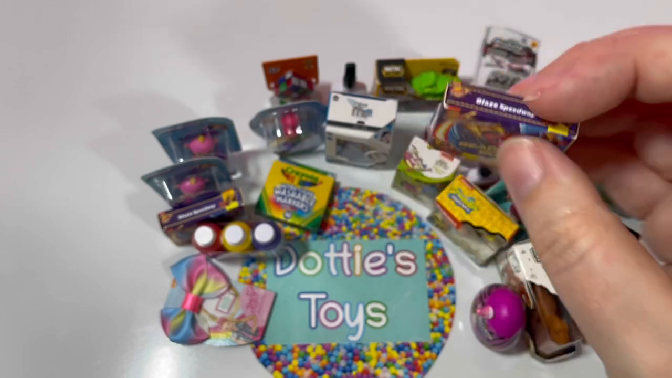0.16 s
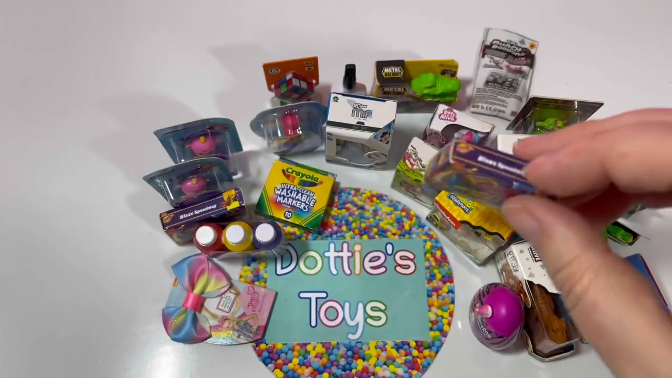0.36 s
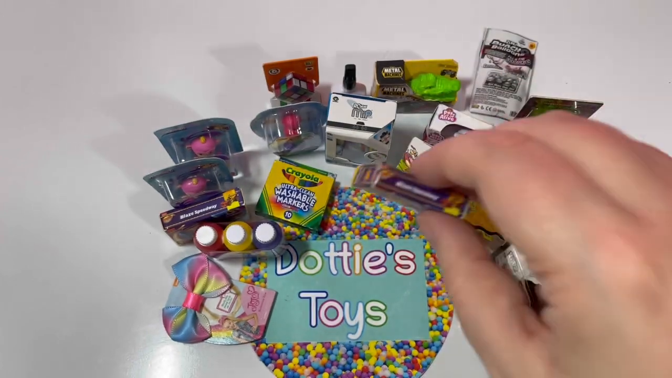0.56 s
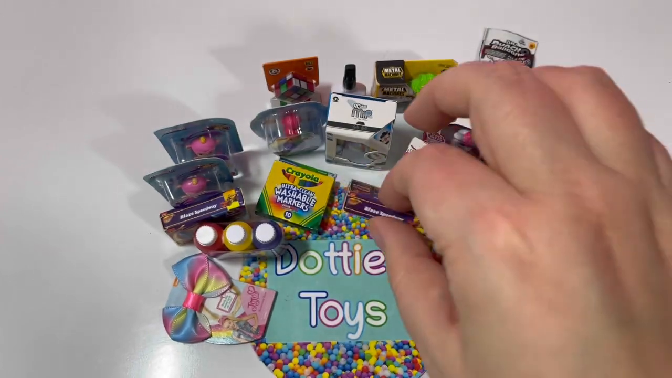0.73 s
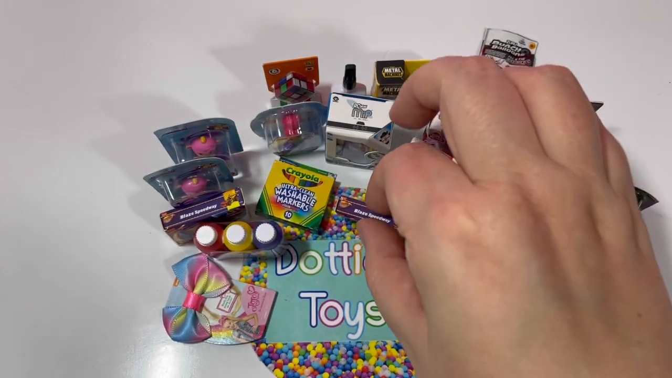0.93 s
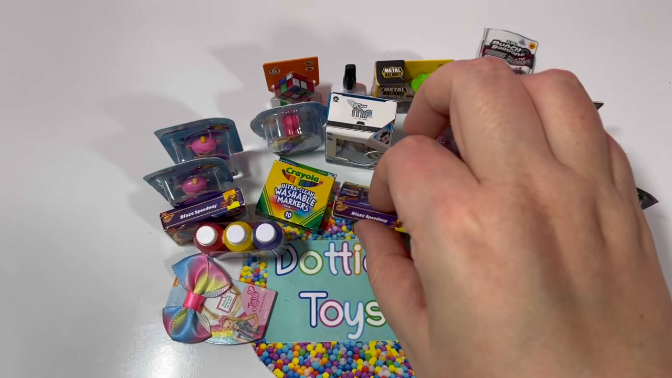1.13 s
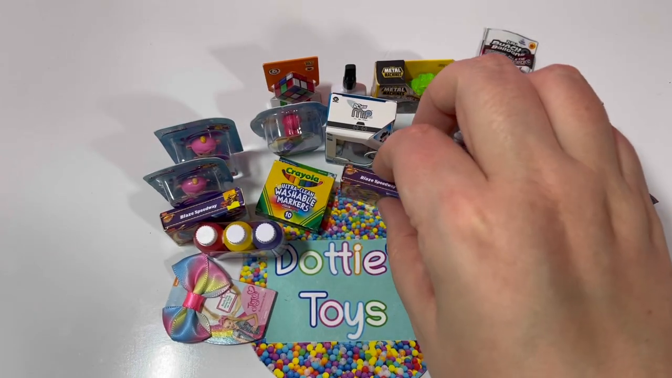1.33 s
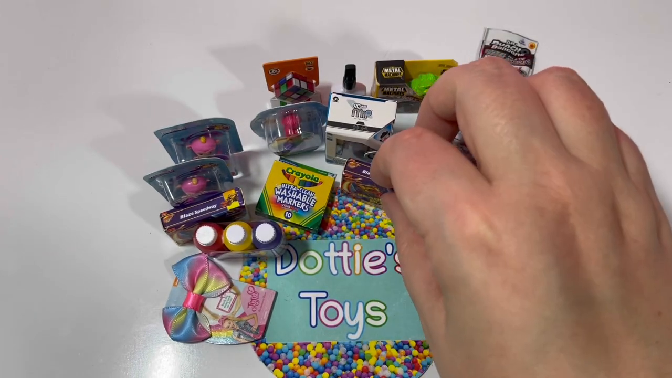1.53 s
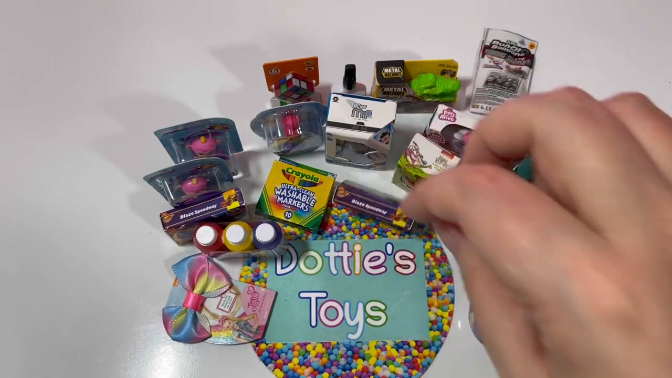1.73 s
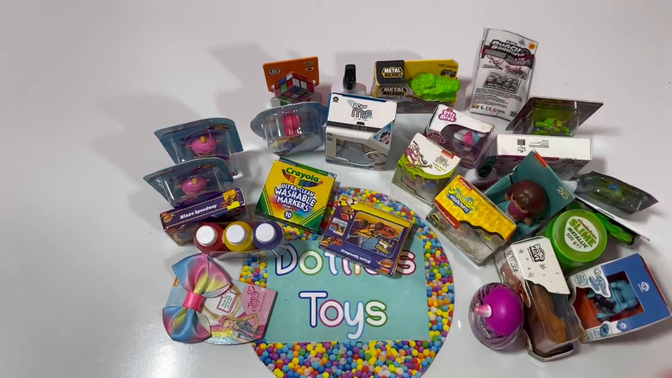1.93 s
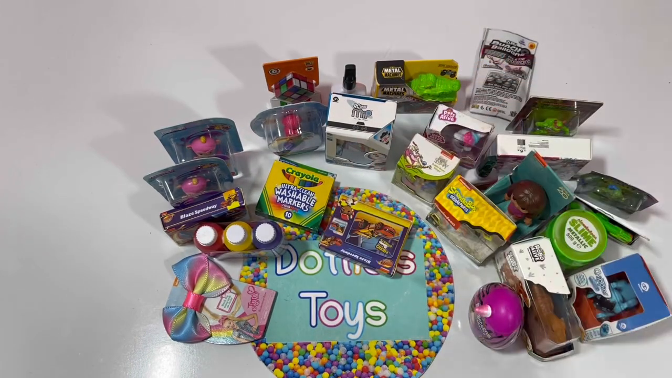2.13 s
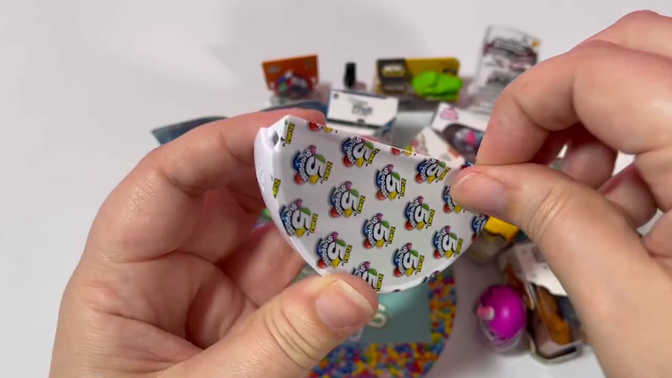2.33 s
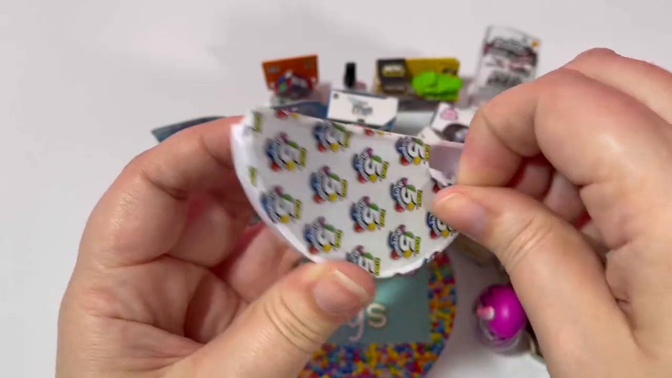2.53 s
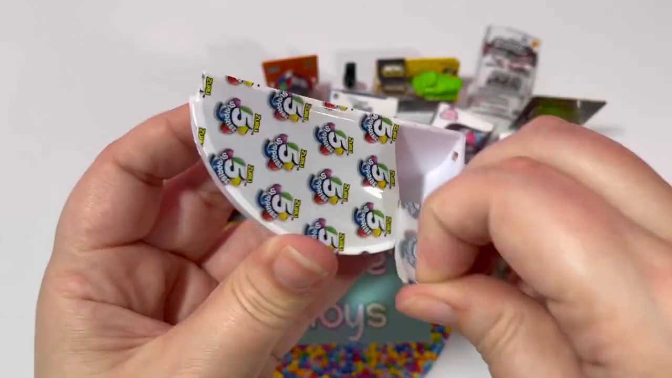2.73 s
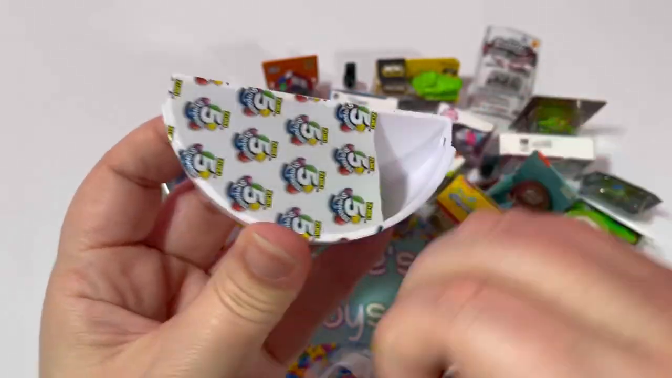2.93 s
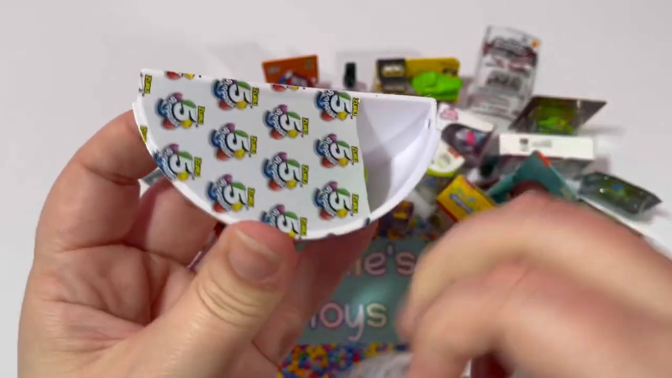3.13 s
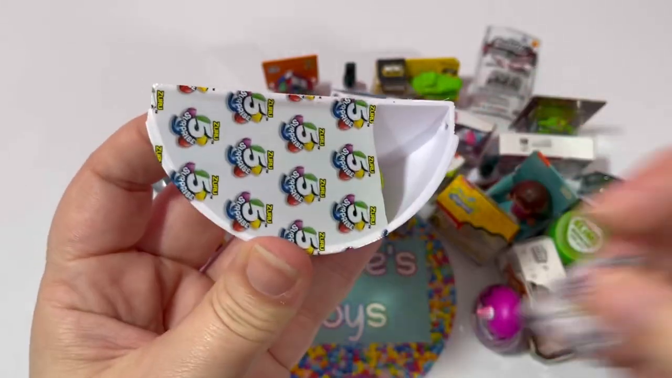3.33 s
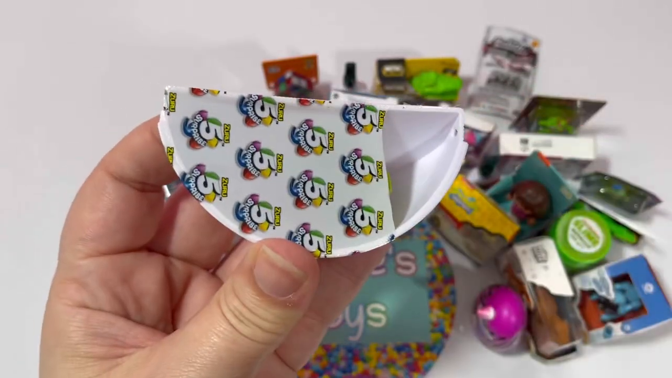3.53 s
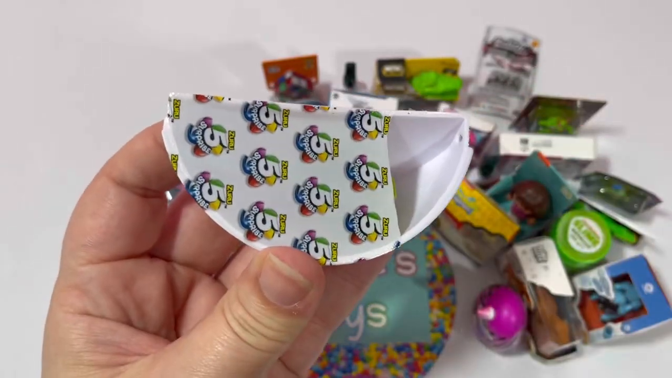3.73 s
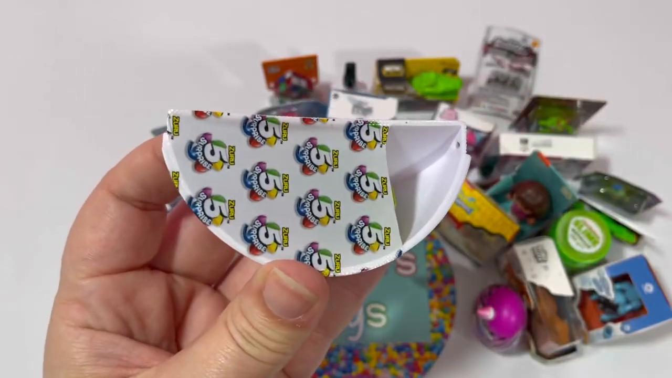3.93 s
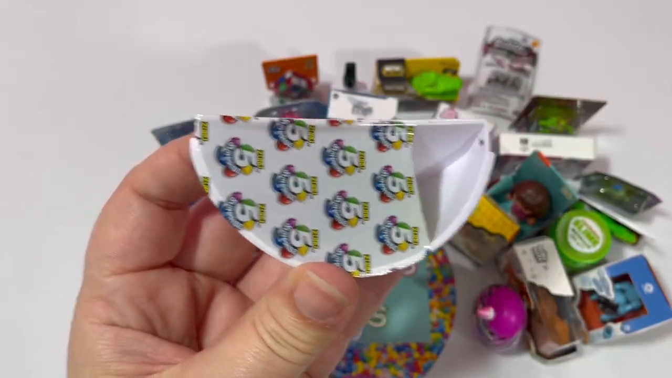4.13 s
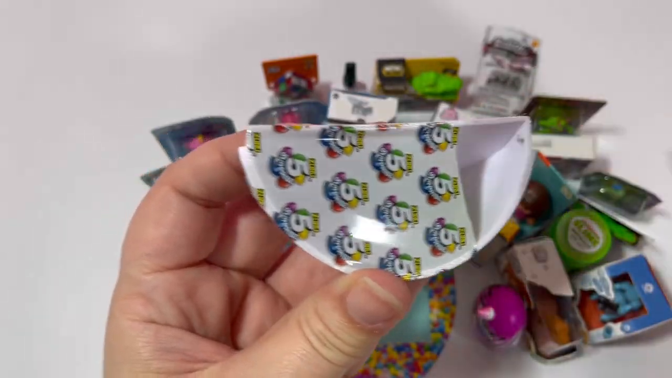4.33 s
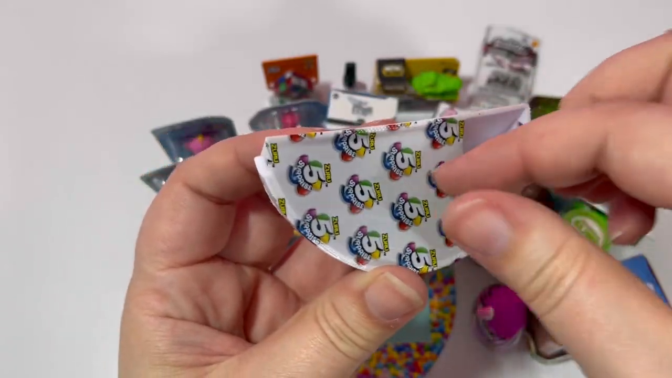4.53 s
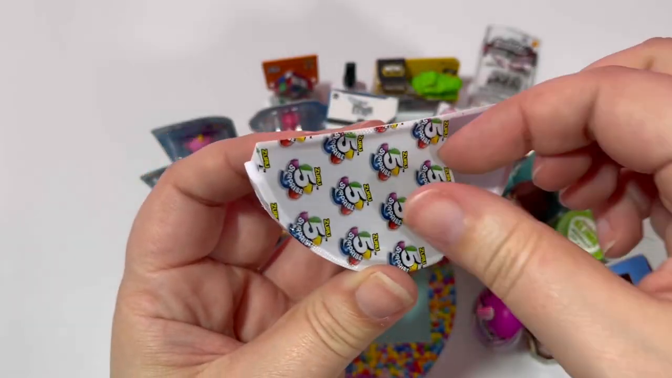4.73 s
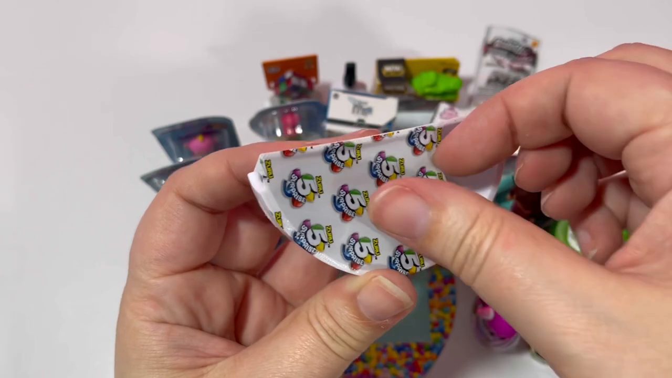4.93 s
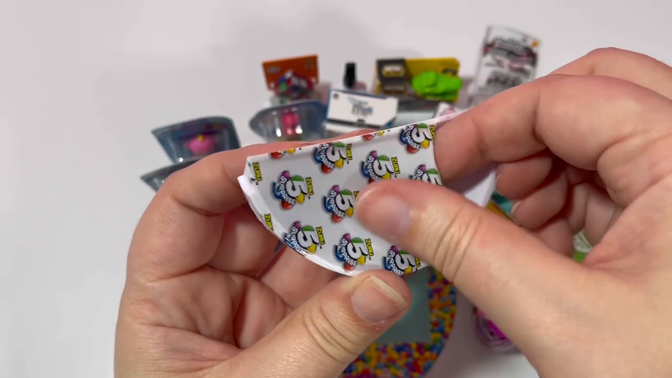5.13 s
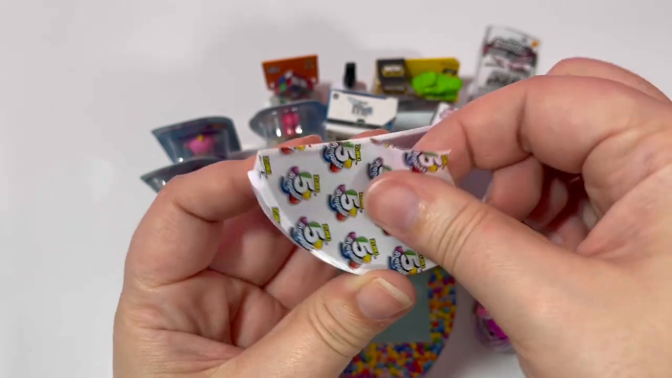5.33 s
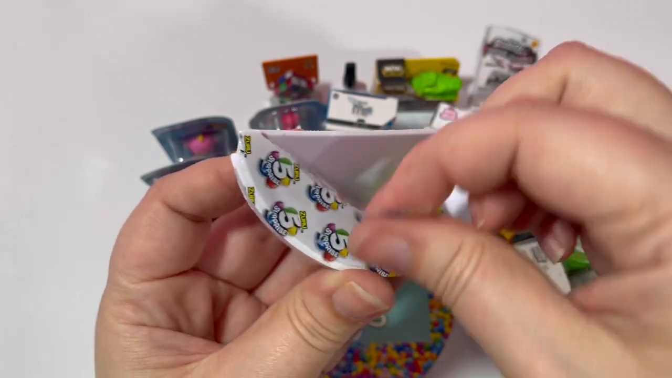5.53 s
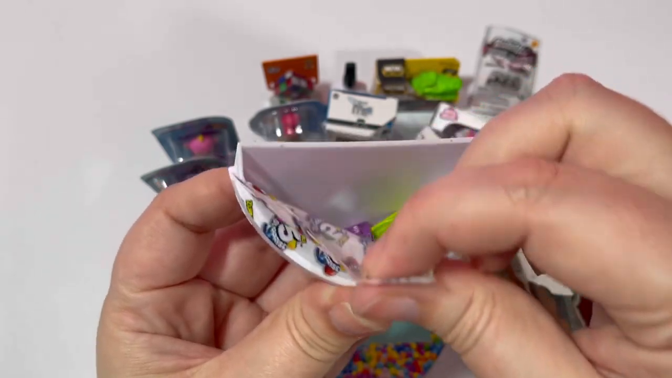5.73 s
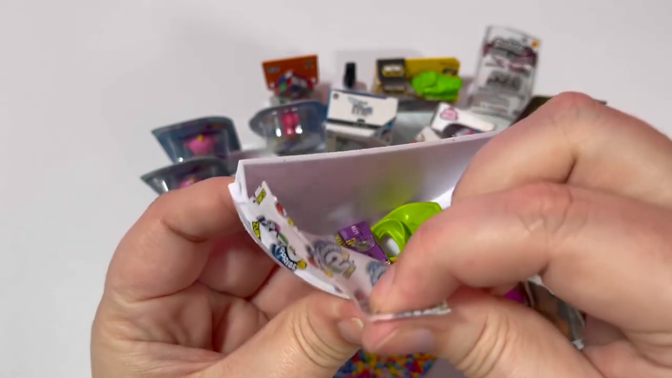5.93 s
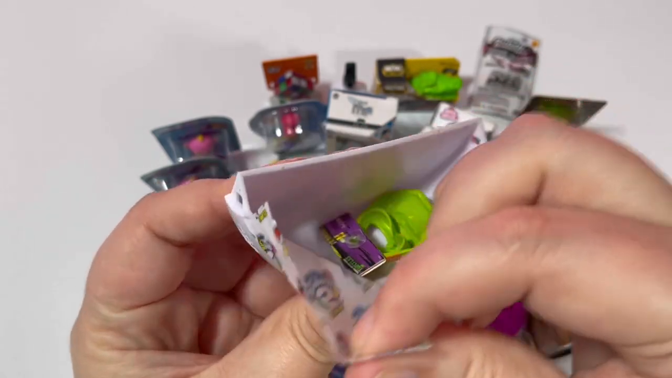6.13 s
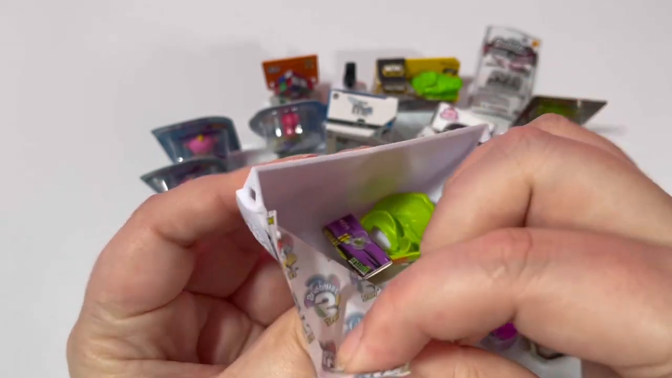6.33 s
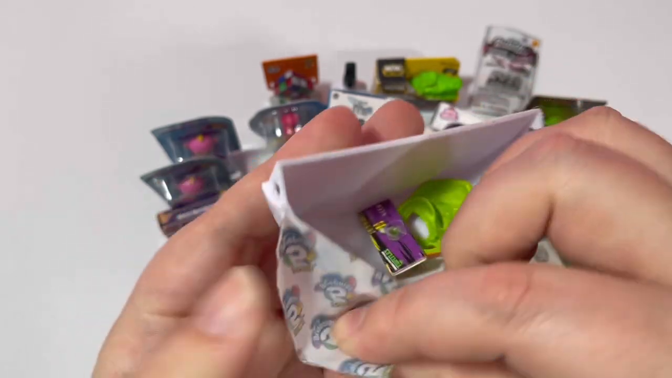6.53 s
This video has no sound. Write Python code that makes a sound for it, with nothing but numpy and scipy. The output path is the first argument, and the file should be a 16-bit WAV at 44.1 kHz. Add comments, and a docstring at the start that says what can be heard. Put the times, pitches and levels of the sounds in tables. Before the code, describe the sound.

Close, dry plastic snaps and tearing crackle as a sticky film is pulled from a hollow capsule in a quiet room, after soft box clicks.

```python
"""Peeling a film from a hollow capsule

Hands set down a small toy box, then peel a glued film off a hollow plastic capsule, close by in a quiet room.
The glue lets go in sharp snaps: each burst of noise excites the enclosed air, the thin walls and the film.
Fast pulls tear in dense crackle, from noise modulated by random slips; a stiff rim rings on after both.
Fingers slide with a faint filtered hiss. A room tail, a soft hush, a low rumble and a distant hum lie behind."""
import sys
import numpy as np
from scipy import signal
from scipy.io import wavfile
from scipy.ndimage import uniform_filter1d

SR = 44100
rng = np.random.default_rng(int(sys.argv[2]) if len(sys.argv) > 2 else 0)


def materialize(psi):
    """Save the field psi as 16-bit PCM at rate SR to the path in sys.argv[1].

    A 1-D psi becomes a single channel; in a 2-D psi each row is a channel.
    """
    bounded = np.clip(np.atleast_2d(psi).T, -1, 1)
    quanta = np.round(bounded * 32767).astype(np.int16)
    wavfile.write(sys.argv[1], SR, quanta)


N = 289549

# Film snaps, and faint ticks of the dropped strip. Each row: start in seconds, cavity peak in dB,
# cavity resonance in Hz, crack peak in dB above the cavity, favoured crack band in Hz.
SNAPS = [(2.1647, -56, 1760, -17, 6900), (2.18, -62, 1710, 1, 7500), (2.2346, -58, 1710, 9, 7600),
         (2.239, -58, 1980, 8, 5900), (2.2486, -54, 1910, 11, 6900), (2.257, -63, 1970, 9, 7000),
         (2.2773, -49.5, 1700, 2, 7900), (2.2938, -40.5, 1980, 0, 8900), (2.3029, -22.5, 2316, 4, 6200),
         (2.315, -25, 1610, 9, 6200), (2.3411, -22, 2400, 2, 8100), (2.3526, -27.5, 2150, -3, 9900),
         (2.37, -35, 1580, -2, 6200), (2.505, -45.5, 2030, 6, 8400), (2.529, -21.5, 1980, 6.5, 8400),
         (2.5311, -19.5, 1900, 7, 8550), (2.5373, -31.5, 2020, 6.5, 8500), (2.5423, -30, 1966, 16, 8800),
         (2.546, -24, 2000, 10.5, 8600), (2.5503, -22.5, 2160, 6.5, 7600),
         (2.5564, -23.5, 2270, 11.5, 8400), (2.5599, -22.5, 2260, 3.5, 8600),
         (2.5631, -20, 1880, 3.5, 9050), (2.5659, -22.5, 2190, 4.5, 8700), (2.5759, -23.5, 2160, 4, 8000),
         (2.5787, -22, 2240, 3, 8750), (2.5847, -26, 2060, 1, 8300), (2.5887, -22, 1860, 0, 7100),
         (2.598, -31, 2180, 1, 8600), (2.7442, -20.5, 2140, 4, 8100), (2.7469, -21.5, 1990, -8, 8200),
         (2.7567, -19.5, 1860, -8, 7700), (2.7643, -26.5, 1830, 3, 8200), (2.7677, -25.5, 1760, -3, 7060),
         (2.7765, -28.5, 2300, -6, 8100), (2.7972, -28, 2140, 0, 10000), (2.807, -34, 2120, 0, 10500),
         (2.8199, -38.5, 2050, 1, 8860), (3.0795, -60.5, 2700, 12.5, 7800),
         (3.0878, -64.5, 2160, 19.5, 8700), (3.0994, -60, 2310, 22, 8700), (3.1291, -72, 2280, 16, 8500),
         (3.1918, -58, 2800, 14.5, 8450), (3.2577, -57.5, 3350, 17, 10300), (3.689, -69, 3300, 9, 5000),
         (3.83, -56, 3440, 3.5, 7300), (4.147, -63, 3300, 4, 4960), (4.4112, -46, 1930, -14, 8000),
         (4.539, -59, 2210, -6, 5900), (4.8962, -20.5, 1826, -15.5, 3600), (4.937, -48.5, 1650, -1, 6100),
         (5.0094, -38.5, 1740, -6, 5600), (5.031, -50, 1920, -9, 6800), (5.0649, -45.5, 2200, -8, 5700),
         (5.1463, -57, 1820, 13.5, 8600), (5.1526, -29, 2200, -4, 9000), (5.1557, -17, 1830, -9, 6800),
         (5.1577, -9, 2070, 2.5, 8300), (5.165, -16.5, 2200, 0, 8500), (5.1746, -13, 2050, -3.5, 7900),
         (5.1816, -14.5, 1760, -3.5, 7600), (5.1898, -12.5, 1840, -3, 7800), (5.1972, -14, 1900, -8, 9300),
         (5.2035, -12, 1820, -3.5, 8100), (5.211, -14, 2110, -1.5, 9400), (5.218, -21, 1930, 4.5, 8500),
         (5.2241, -16.5, 1740, -3.5, 8500), (5.2387, -11.5, 2020, -2.5, 9050),
         (5.2464, -13.5, 1920, -13.5, 7800), (5.2606, -13, 1930, -2.5, 7200), (5.2688, -10, 1800, -7, 8000),
         (5.2758, -10, 1950, -5.5, 7300), (5.2785, -12, 1980, -4, 7200), (5.2844, -16, 1870, 0, 7010),
         (5.2875, -17.5, 1930, -19.5, 5950), (5.2976, -13, 1800, 0, 8800), (5.3156, -12, 1870, 0.2, 6200),
         (5.3272, -15, 1980, 4, 6400), (5.3311, -20, 2090, 7.5, 5800), (5.3651, -11, 2040, -3, 7550),
         (5.373, -13.5, 1970, 1.5, 7820), (5.3768, -19.5, 1900, -4, 7300), (5.4052, -37, 1860, 0, 7700),
         (5.422, -9, 1900, 3, 11500), (5.4303, -20.5, 2150, 11.5, 6150), (5.4361, -21, 1980, 7, 9000),
         (5.446, -21, 2120, 8.5, 8450), (5.4833, -32.5, 1810, 8, 5800), (5.493, -15.5, 2270, -21, 9300),
         (5.51, -27.5, 2250, -3, 6700), (5.656, -69, 2100, 14, 8500), (5.672, -71.5, 2100, 12, 8970),
         (5.7017, -41, 2116, -4, 5440), (5.7703, -47.5, 2060, 6, 5600), (5.7901, -40, 1910, 2, 8960),
         (5.8039, -64, 2260, 6, 7000), (5.8232, -28, 2070, -5, 5100), (5.8399, -38.5, 2190, -4, 5800),
         (5.8631, -38, 2120, 4.5, 9100), (5.8726, -46, 2100, 5, 9000), (5.882, -47, 2130, 6, 10400),
         (5.899, -40, 2260, 13, 8500), (5.965, -49.5, 2030, 10, 6000), (5.98, -40.5, 1870, 6, 6400),
         (5.9944, -44, 2000, 3, 12000), (6.0092, -44, 2210, 8, 9000), (6.012, -38.5, 2410, 12, 7960),
         (6.0309, -27, 1980, -6, 7300), (6.0373, -23.5, 2120, -2, 5230), (6.0537, -25, 2230, -1.5, 6200),
         (6.0584, -29, 2140, -2.5, 7100), (6.095, -41.5, 2260, -4, 4560), (6.1127, -62, 2300, 9, 10400),
         (6.1963, -71, 2260, 16, 6950), (6.212, -63.5, 1970, 17.5, 8900), (6.2291, -64, 2090, 12, 11850),
         (6.2424, -58.5, 2160, 17, 11500), (6.2523, -53, 1950, 17, 6600), (6.2663, -53.5, 1950, 19, 12200),
         (6.2704, -66, 2300, 14, 7040), (6.3083, -39, 2200, -8, 7900), (6.3315, -48, 2290, 5, 6200),
         (6.3609, -49, 2200, -8, 8350), (6.3922, -42.5, 2060, 21, 8800), (6.4269, -19, 2150, 4.5, 7340),
         (6.5264, -49, 1910, -16, 6200)]
# Fast pulls. Each row: start in seconds, length in seconds, crackle level in dB, change to the end in dB,
# cavity level in dB above the crackle, level of the added favoured band in dB.
TEARS = [(2.298, 0.031, -40, -2, 1.5, 7), (2.342, 0.019, -28.5, -28.5, 2.5, -3),
         (2.526, 0.038, -32.5, 0.5, -4.5, 10.5), (2.56, .042, -31, -9, 2, 1), (2.742, 0.033, -35, 3, -3, 8),
         (2.771, 0.049, -38.5, -7.5, 2, -15), (5.152, 0.02, -27.5, -4, -0.5, 6),
         (5.428, 0.015, -26, -8.5, 5, 6), (5.493, 0.01, -19, -13.5, 0, -14),
         (5.502, 0.015, -33.5, -13, 1, 3), (6.007, 0.021, -42, -16, 0.2, 6),
         (6.025, 0.022, -44.5, -4.5, 6.5, -5)]
# The hollow body's colour over time: first the toy box, then the capsule as the film comes off.
# Each row: time in seconds, cavity resonance in Hz, favoured crackle band in Hz, wall resonance in Hz,
# wall thud in dB above the cavity.
BODY_STAGES = [(.6, 1800, 7000, 700, -25), (.69, 2360, 7000, 700, -30), (2.26, 1900, 6900, 700, -28),
               (2.3, 2200, 6200, 1200, -6), (2.34, 2030, 8040, 1200, -9.5), (2.36, 1700, 8960, 1000, -3),
               (2.53, 2120, 8500, 600, -14.5), (2.6, 2030, 8400, 450, -16), (2.75, 1980, 8000, 520, -15.5),
               (2.81, 2050, 9800, 750, -7), (3.08, 1800, 8500, 600, -30), (4.6, 1850, 8500, 600, -30),
               (4.9, 1800, 6000, 950, -15.5), (5.15, 2050, 8200, 930, -14), (5.29, 1900, 7400, 1120, -19),
               (5.32, 2000, 6500, 730, -16), (5.5, 2150, 8000, 560, -12), (5.8, 1950, 7500, 870, -11),
               (6.0, 2100, 8500, 860, -1), (6.036, 2100, 6000, 520, -10.5), (6.056, 2150, 6200, 600, -15.5),
               (6.11, 2200, 8000, 448, -42), (6.5, 2100, 8000, 450, -37)]
# Resonances of the thin plastic walls. Each row: frequency in Hz, width in Hz, level in dB.
WALL_MODES = [(400, 200, -1.5), (496, 99, 4), (750, 400, -0.5), (906, 300, 1.5), (1256, 350, -2.5),
              (1334, 40, -1)]
# Resonances of the stiff rim, ringing on. Each row: frequency in Hz, width in Hz, level in dB.
RIM_MODES = [(2960, 40, -7.5), (3680, 17, 4), (3860, 14, -3), (5070, 50, -9.5)]
# Crack spectrum of the narrow first strip. Each row: frequency in Hz, relative density in dB per Hz.
STRIP_COLOUR = [(1710, -16.5), (2900, -8), (3090, 1.5), (3230, -2), (4360, -7), (5840, -4.5), (6640, -11.5),
                (9100, -3.5), (10600, -10), (15200, -10), (16000, -18.5)]
# Crack spectrum of the wide sheet. Each row: frequency in Hz, relative density in dB per Hz.
SHEET_COLOUR = [(1710, -56.5), (2900, -5), (3590, -3), (3890, -2), (4680, -8), (5170, 1), (6190, -2),
                (6930, -5.5), (8120, -2.5), (9230, -5.5), (11800, -3.5), (13100, -3.5), (16000, -5.5)]
# The toy box touching fingers, table and other toys. Each row: start in seconds, body peak in dB,
# body resonance in Hz, tick peak in dB above the body, favoured tick band in Hz.
TAPS = [(0.5287, -69, 1500, 14, 11200), (0.703, -52.5, 2310, -9, 7200), (0.7079, -53, 2300, -7, 8900),
        (0.741, -57, 2800, -5, 7100), (0.848, -48, 1890, -5, 4380), (0.917, -49.5, 1400, -4, 8800),
        (0.943, -66, 2480, 13, 9600), (0.977, -44, 1250, -32, 5500), (1.2793, -49, 2760, -11, 4300),
        (1.7534, -32.5, 2950, -0.5, 5300), (1.7569, -27.5, 2310, -13, 9800), (1.7919, -50, 1960, -3, 4800),
        (1.8554, -51.5, 2050, -2, 5200), (2.0417, -59.5, 2620, 13.5, 5000), (2.069, -47.5, 2140, 3.5, 5700),
        (2.1131, -59.5, 1830, 7, 5400)]
# Tick spectrum of the card toy box. Each row: frequency in Hz, relative density in dB per Hz.
CARD_COLOUR = [(1500, -23), (2800, 3.5), (4000, 4), (7000, -10), (12000, -2), (16000, -4.5)]
# Fingers sliding on card and film. Each row: start in seconds, length in seconds,
# hiss level in dB before the pressure arch, cavity level in dB above the hiss, favoured hiss band in Hz.
RUBS = [(0.0, 0.044, -63.5, -10, 7800), (0.021, 0.072, -63, -15, 7800), (0.256, .14, -73.5, -6, 7500),
        (0.452, 0.068, -76, -6, 7900), (0.5, 0.097, -70, -9, 9400), (0.654, 0.066, -71.5, 4.5, 7600),
        (.79, 0.044, -78, 3, 7400), (.91, 0.062, -66.5, -4, 8850), (1.723, 0.013, -71, -4, 6500),
        (1.756, 0.073, -75, 2, 4200), (2.041, 0.036, -69, -3, 6640), (2.093, 0.053, -70, -4, 5500),
        (2.227, 0.072, -70, 0, 6860), (3.105, .04, -71, -16, 8400), (3.165, 0.041, -68.5, -6, 8400),
        (3.235, 0.041, -67, -17, 9670), (4.397, .11, -66.5, -3.5, 9300), (4.54, 0.094, -68, -1.5, 9500),
        (4.728, .05, -76, -4, 8100), (4.865, 0.051, -61.5, 5.5, 7000), (4.904, 0.036, -71, 16, 6000),
        (4.967, 0.069, -61.5, 2, 7200), (5.04, 0.058, -71.5, 6, 6500), (5.773, 0.044, -69.5, -3, 8270),
        (5.976, 0.031, -63.5, 9, 7200), (6.065, 0.062, -73, -10.5, 6900), (6.277, 0.0495, -49.5, -6, 8400),
        (6.334, 0.0695, -60.5, 3.5, 9000), (6.396, 0.035, -60, 1, 8800), (6.44, 0.16, -84, 13, 6500)]
# Spectrum of sliding skin. Each row: frequency in Hz, relative density in dB per Hz.
SKIN_COLOUR = [(1710, -26.5), (2900, 2.5), (3090, 0), (3320, -9.5), (3590, 0), (3830, -6.5), (4360, -5),
               (5600, -5), (6100, -4), (6690, -3.5), (7190, -2.5), (9700, -5), (12400, -2), (14800, -3.5),
               (16000, -31)]
# Decay of the room. Each row: frequency in Hz, time to fall by 60 dB in seconds.
ROOM_DECAY = [(250, 0.15), (700, 0.32), (1800, 0.31), (3500, 0.31), (5500, 0.31), (9000, .3), (12000, 0.28),
              (15500, 0.26)]
# The capsule's mouth beams some bands at the listener, so the room gets a flatter share.
# Each row: frequency in Hz, relative level sent to the room in dB.
ROOM_SHARE = [(300, 1.5), (1400, 6), (2100, -3.5), (3200, -1), (6500, 1.5), (8800, -2.5), (12000, 1)]
# Spectrum of the quiet background hush. Each row: frequency in Hz, relative density in dB.
HUSH_COLOUR = [(53, -44), (90, -18), (112, 1), (145, -5), (201, -4), (296, -2), (360, -5), (488, -8.5),
               (769, -11), (1040, -14.5), (2000, -20.5), (2380, -27.5), (16000, -38)]
# Spectrum of the low background rumble. Each row: frequency in Hz, relative density in dB.
RUMBLE_COLOUR = [(7.1, -29.5), (12, 5), (43, -1), (61, -7), (81, -20.5), (90, -24.5), (120, -45),
                 (200, -120)]
# Tones of a distant appliance. Each row: frequency in Hz, width in Hz, rms level in dB.
HUM_TONES = [(120.4, 7.2, -70.5), (210.2, 3.5, -72), (227.2, 11, -75), (363, 6.5, -76)]
# Overall level: a brief dip, then a fall at the very end. Each row: time in seconds, gain in dB.
LEVEL_CURVE = [(2.118, 0), (2.14, -10), (2.151, -35), (2.157, -30), (2.163, 0), (6.5635, 0), (6.5657, -40)]

SHEET_FROM_S = 4  # the narrow strip colours the cracks before this, the wide sheet after
GRIP_S = 6  # from here the fingers clamp the rim: nothing more sets it ringing
CAVITY_WIDTH_HZ = 480  # air in the hollow body, narrowest of three passes
WALL_SCATTER_DB, TEAR_WALL_DB = 2.5, 3  # spread from snap to snap; extra wall level in a tear
CRACK_S = 0.0025  # the film itself stops moving sooner than the body it shakes
THUD_DB, THUD_SLOPE, THUD_HZ = 4, 0.97, 600  # firmer taps thud more: dB above a full-scale body, dB per dB
RUB_SKEW, RUB_ROUND = 0.93, 0.76  # exponents of the pressure arch: quick to build, slower to ease
HUSH_DB, RUMBLE_DB = -62.5, -52.5  # rms
ROOM_DB, EDGE_HZ = -8.5, 15750  # level of the room tail; upper band limit


def snaps(strip, sheet):
    """Impulsive release: each snap or tick shakes the walls as far as the stage of the peeling allows."""
    s, *columns = np.transpose(SNAPS)
    _, _, wall_hz, wall_db = stage(s)
    wall_db = wall_db + WALL_SCATTER_DB * rng.standard_normal(len(s))
    table = np.transpose([s, *columns, wall_db, wall_hz])
    early = s < SHEET_FROM_S
    release = dict(width=CAVITY_WIDTH_HZ, let_go_s=0.001, spike=3.55)
    out = knocks(table[early], strip, favour_db=14.0, **release)
    return out + knocks(table[~early], sheet, favour_db=9.0, **release)


def tear(row, film, slips_per_s=2500, spread_db=6.0, between=0.89):
    """Cascading fracture: glue fibres break in quick uneven succession over a finer fizz."""
    s, length, db, change_db, cavity_db, lift_db = row
    t = np.arange(0, length, 1 / SR)
    cavity_hz, crack_hz, _, wall_db = stage(s + t)
    chance = rng.random(len(t))
    size = rng.exponential(1, len(t))
    grit = rng.standard_normal(len(t))
    slips = amp(spread_db * np.minimum(size, 4)) * (chance < slips_per_s / SR)
    decaying_slips = evened(signal.lfilter([1], [1, -.95], slips))
    push = grit * (between + decaying_slips)
    crackle = evened(favoured(np.convolve(push, film)[:len(t)], crack_hz, lift_db, 2000))
    air = evened(cavity(push, cavity_hz))
    walls = amp(wall_db + TEAR_WALL_DB) * evened(ring(push, WALL_MODES))
    sound = crackle + amp(cavity_db) * (air + walls)
    return s, amp(db + change_db * t / length) * sound * signal.windows.tukey(len(t), .1)


def rim(peeling):
    """Forced vibration: the peeling drives lightly damped rim modes until the fingers clamp them."""
    return ring(peeling * (np.arange(N) < GRIP_S * SR), RIM_MODES)


def box_taps(card):
    """Impact: contact excites the toy box's broad body resonance, and firmer taps thud more."""
    taps = [(*row, THUD_DB + THUD_SLOPE * row[1], THUD_HZ) for row in TAPS]
    return knocks(taps, card, width=2080, let_go_s=0.0015, spike=3.6, favour_db=14.0)


def rub(row, skin):
    """Sliding friction: skin on a smooth face gives a lumpy hiss, partly heard through the hollow body."""
    s, length, db, cavity_db, hiss_hz = row
    t = np.arange(0, length, 1 / SR)
    grit, lumps = rng.standard_normal((2, len(t)))
    push = grit * amp(2.5 * evened(uniform_filter1d(lumps, 250)))
    hiss = evened(favoured(np.convolve(push, skin)[:len(t)], hiss_hz, 2.5, 1700))
    pressure = abs(np.sin(np.pi * (t / length) ** RUB_SKEW)) ** RUB_ROUND
    cavity_hz = stage(s + t)[0]
    hollow = amp(cavity_db) * evened(cavity(push, cavity_hz))
    return s, amp(db) * pressure * (hiss + hollow)


def knocks(table, colour, width, let_go_s, spike, favour_db, bounce_s=0.00051):
    """Impulsive excitation: a sudden release, a ragged after-slip and a bounce off the table."""
    out, t = np.zeros(N), np.arange(900) / SR
    grits = rng.standard_normal((len(table), 900))
    for (s, db, hz, crack_db, crack_hz, wall_db, wall_hz), grit in zip(table, grits):
        after_slip = np.exp(-t / let_go_s)
        bounce = 1.1 * (t > bounce_s) * np.exp(-abs(t - bounce_s) / let_go_s)
        push = grit * (after_slip + bounce)
        push[0] = spike
        crack = np.convolve(push * np.exp(-t / CRACK_S), colour)[:900]
        crack = favoured(crack, crack_hz, favour_db, 3100)
        wall = favoured(ring(push, WALL_MODES), wall_hz, 19.0, 200)
        layers = peaked(cavity(push, hz, width)) + amp(crack_db) * peaked(crack) + amp(wall_db) * peaked(wall)
        add(out, s, amp(db) * layers)
    return out


def stage(s):
    """Changing resonator: cavity Hz, crack Hz, wall Hz and wall dB of the hollow body at time s."""
    at, *columns = np.transpose(BODY_STAGES)
    return [np.interp(s, at, c) for c in columns]


def cavity(push, hz, width=CAVITY_WIDTH_HZ):
    """Cavity resonance: three cascaded passes leave a steep-sided ring around hz."""
    broad = resonate(push, hz, 2.6 * width)
    return resonate(resonate(broad, hz, 1.6 * width), hz, width)


def ring(x, modes):
    """Modal superposition: x drives resonances of alternating sign, kept out of the deep bass."""
    out = sum((-1) ** k * amp(db) * resonate(x, hz, w) for k, (hz, w, db) in enumerate(modes))
    return signal.lfilter([1, -1], [1, -.95], out)


def favoured(x, hz, db, width):
    """Selective radiation: x gains one resonant band, such as a patch of film or skin favours."""
    return x + amp(db) * resonate(x, hz, width)


def resonate(x, hz, width):
    """Heterodyne resonance of gain 1: shifts hz down to zero, smooths, and shifts back."""
    turn = np.exp(2j * np.pi * np.cumsum(hz * np.ones(len(x))) / SR)
    r = np.exp(-np.pi * width / SR)
    return 2 * (turn * signal.lfilter([1 - r], [1, -r], x / turn)).real


def colour_of(points):
    """Minimum phase: a causal impulse response with the given spectrum, floored at -60 dB."""
    db = read(points, abs(np.fft.fftfreq(2048, 1 / SR)))
    log_gain = np.log(amp(np.maximum(db, -60)))
    return np.fft.ifft(np.exp(np.conj(signal.hilbert(log_gain)))).real[:400]


def room(x, first_s=.004):
    """Reverberation: sparse taps decay by band, and three tails slowly take turns, so the decay stays smooth."""
    out = np.zeros(N)
    turn = np.pi * np.arange(N) / SR / .09
    for k in range(3):
        taps = np.zeros(SR // 2)
        at = np.arange(0, SR // 2 - 10, 10)
        taps[at + rng.integers(0, 10, len(at))] = rng.choice([-1., 1.], len(at))
        hz, t, z = signal.stft(taps, SR, nperseg=256)
        early = 1 + 4.0 * np.exp(-t / 0.0044)  # table top and nearby toys answer first
        decay_db = read(ROOM_SHARE, hz)[:, None] - 60 * t / read(ROOM_DECAY, hz)[:, None]
        tail = signal.istft(z * early * amp(decay_db), SR, nperseg=256)[1]
        tail = np.append(np.zeros(round(first_s * SR)), tail / np.linalg.norm(tail))
        sent = x * np.cos(turn + k * np.pi / 3) * np.sqrt(2 / 3)  # the three powers sum to a constant
        out += signal.fftconvolve(sent, tail)[:N]
    return out


def hum():
    """Narrow-band noise: sharply filtered noise is heard as faint wavering tones."""
    out = np.zeros(N)
    for hz, width, db in HUM_TONES:
        noise = rng.standard_normal(N)
        out += amp(db) * evened(resonate(resonate(noise, hz, width), hz, width))
    return out


def drone(points, db, patchy_db):
    """Stationary noise: random short-time spectra follow a fixed colour, with drifting patches."""
    frames, hz = N // 1024 + 5, np.fft.rfftfreq(4096, 1 / SR)
    a, b, patches = rng.standard_normal((frames, 2049, 3)).T
    patches = uniform_filter1d(patches, 30, 0)  # across frequency
    patches = evened(uniform_filter1d(patches, 4, 1))  # across time
    z = (a + 1j * b) * amp(read(points, hz)[:, None] + patchy_db * patches)
    return amp(db) * evened(signal.istft(z, nperseg=4096, noverlap=3072)[1][:N])


def amp(db):
    """Decibel law: level in dB to amplitude ratio."""
    return 10 ** (np.asarray(db) / 20)


def evened(x):
    """Power normalisation: scales x to an rms of 1."""
    return x / np.sqrt(np.mean(x ** 2) + 1e-20)


def peaked(x):
    """Peak normalisation: scales x to a peak of 1."""
    return x / (abs(x).max() + 1e-12)


def read(points, hz):
    """Logarithmic pitch scale: interpolates a table along log frequency."""
    f, value = np.transpose(points)
    return np.interp(np.log(hz + 1), np.log(f + 1), value)


def add(mix, s, sound):
    """Superposition: adds sound to mix from s seconds on."""
    part = mix[round(s * SR):][:len(sound)]
    part += sound[:len(part)]


def scene():
    """Linear superposition: peeling, rim, taps and rubs, then their room tail and the background."""
    sheet, strip = colour_of(SHEET_COLOUR), colour_of(STRIP_COLOUR)
    card, skin = colour_of(CARD_COLOUR), colour_of(SKIN_COLOUR)
    near = snaps(strip, sheet)
    for row in TEARS:
        add(near, *tear(row, strip if row[0] < SHEET_FROM_S else sheet))
    near += rim(near)
    near += box_taps(card)
    for row in RUBS:
        add(near, *rub(row, skin))
    hush = drone(HUSH_COLOUR, HUSH_DB, patchy_db=0.24)
    rumble = drone(RUMBLE_COLOUR, RUMBLE_DB, patchy_db=1.54)
    quiet = hush + rumble + hum()
    return (near + amp(ROOM_DB) * room(near) + quiet)[None]


def record(dry):
    """Gain and band limiting: the level follows its curve, then a low-pass filter trims the top."""
    s, db = np.transpose(LEVEL_CURVE)
    levelled = dry * amp(np.interp(np.arange(N) / SR, s, db))
    low_pass = signal.firwin(255, EDGE_HZ, window=("kaiser", 8), fs=SR)
    return signal.oaconvolve(levelled, low_pass[None], "same")


dry = scene()
out = record(dry)
materialize(out)
```